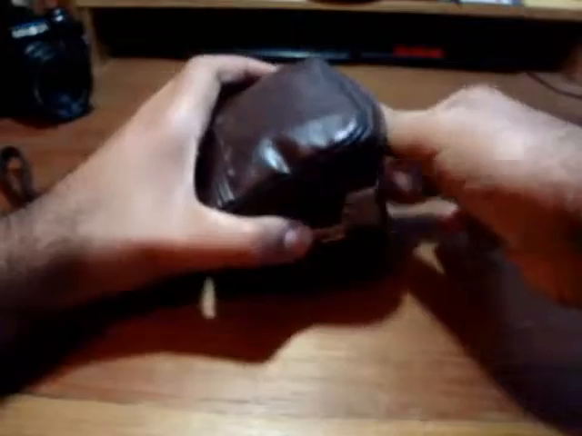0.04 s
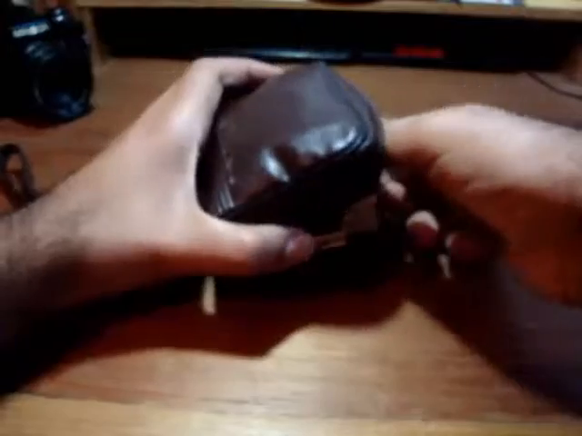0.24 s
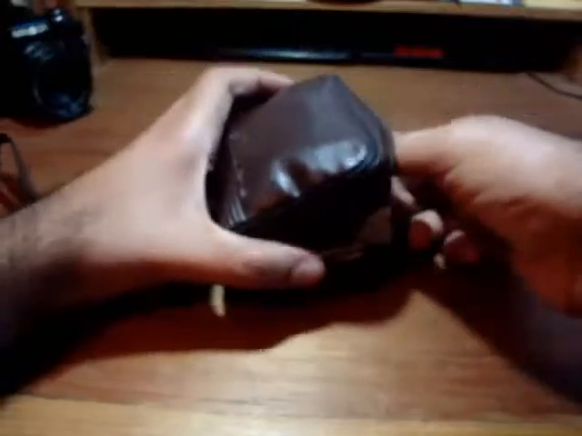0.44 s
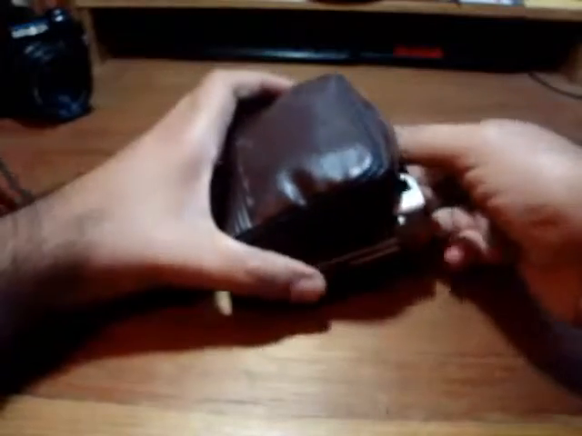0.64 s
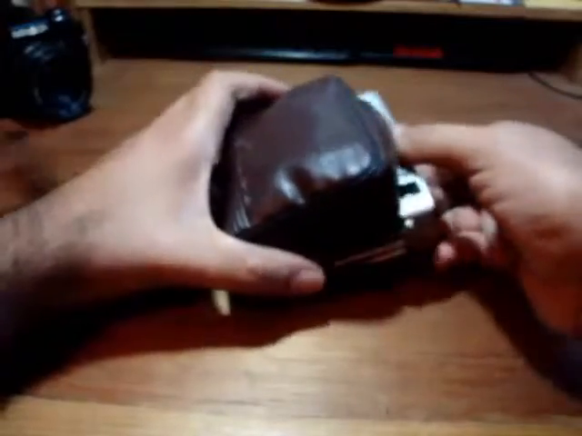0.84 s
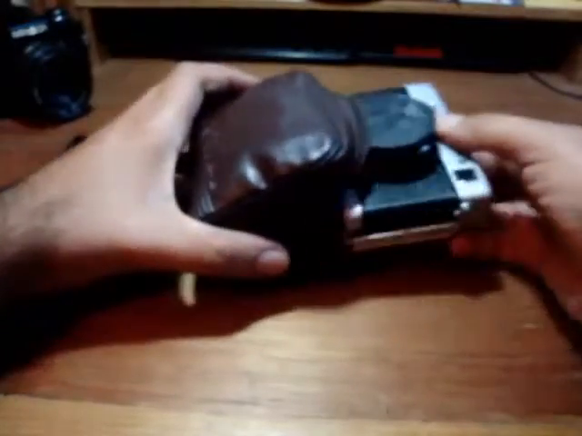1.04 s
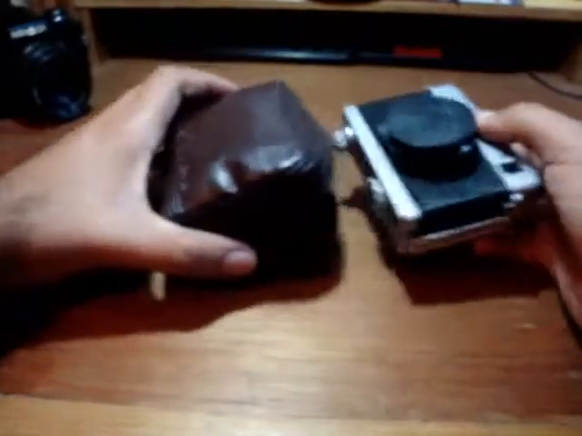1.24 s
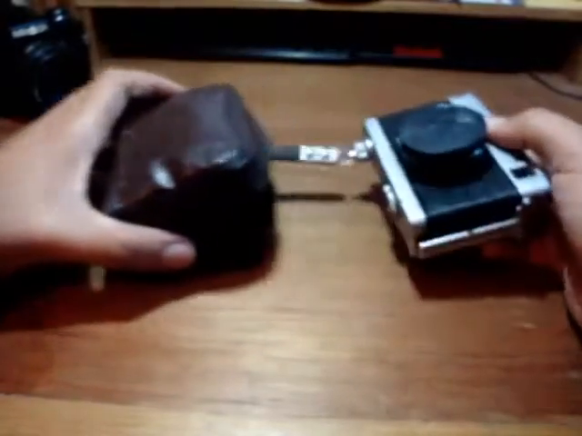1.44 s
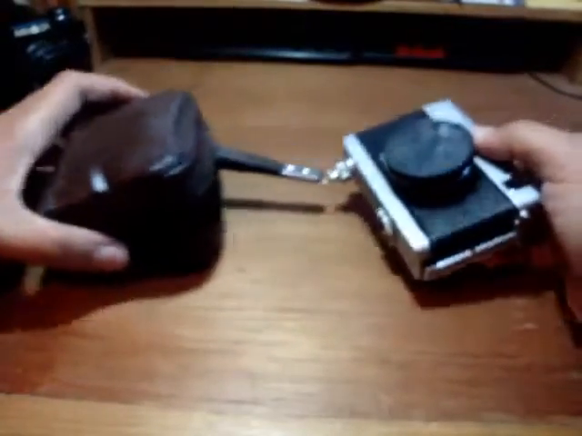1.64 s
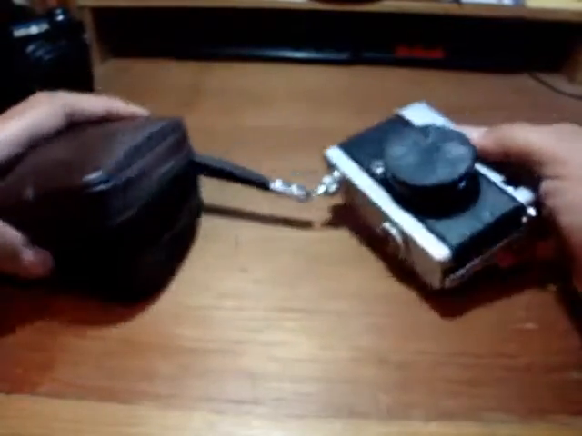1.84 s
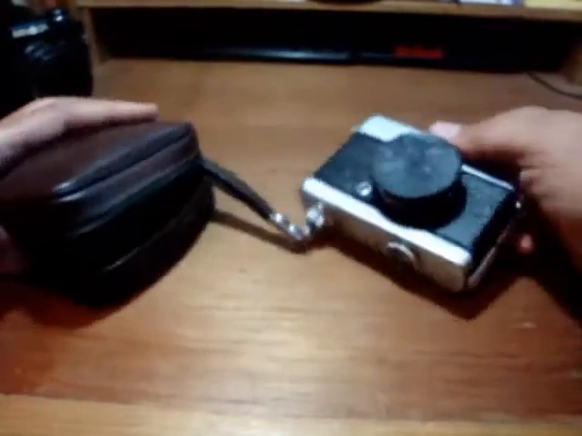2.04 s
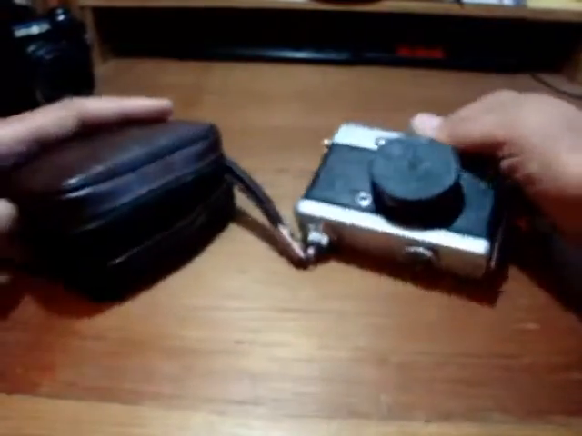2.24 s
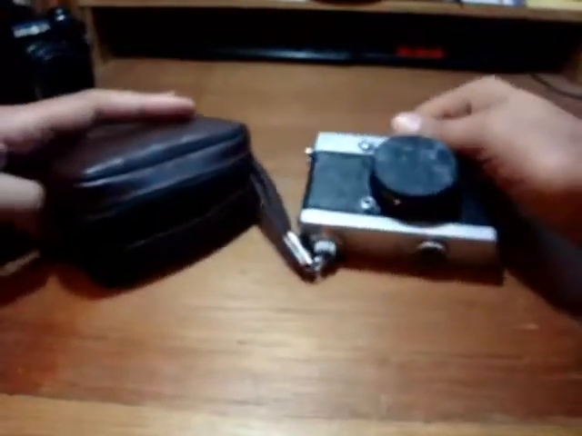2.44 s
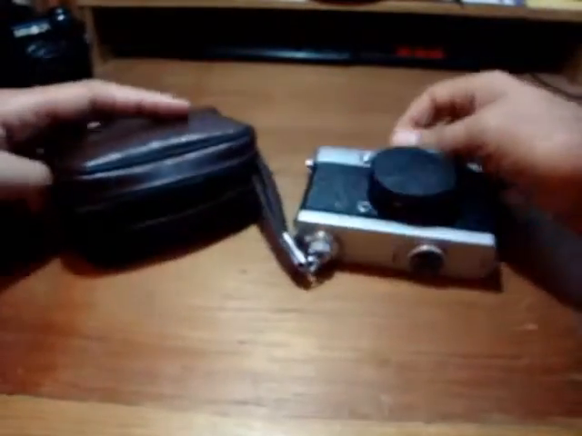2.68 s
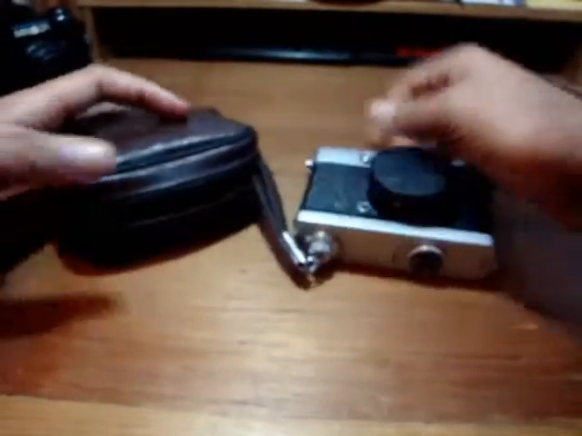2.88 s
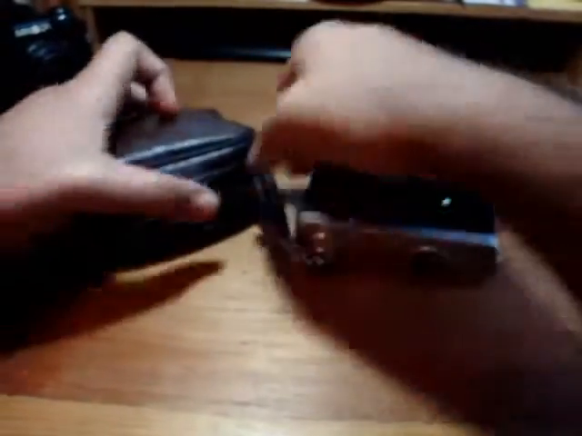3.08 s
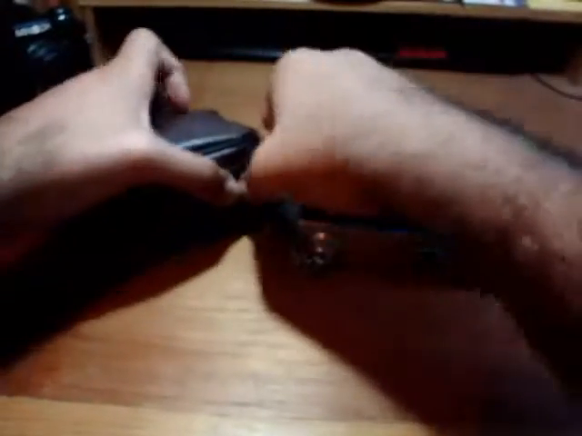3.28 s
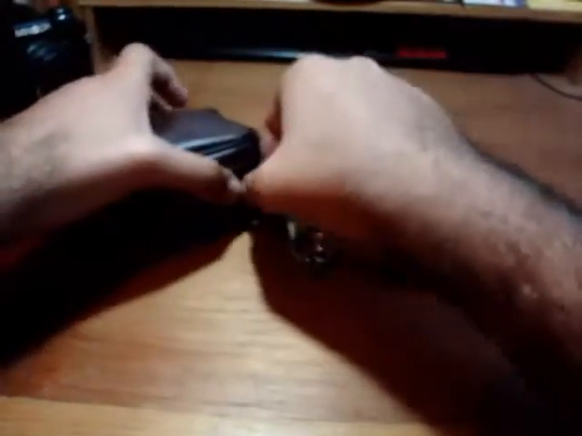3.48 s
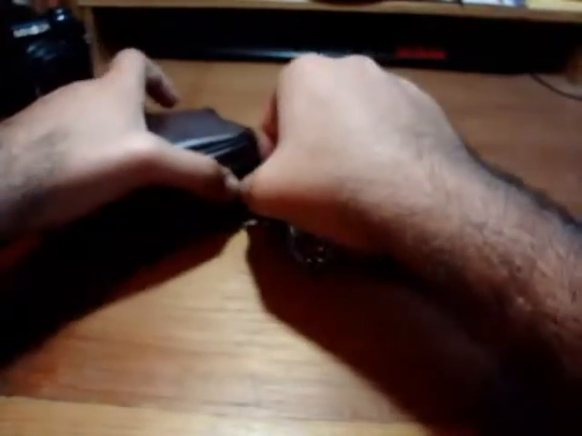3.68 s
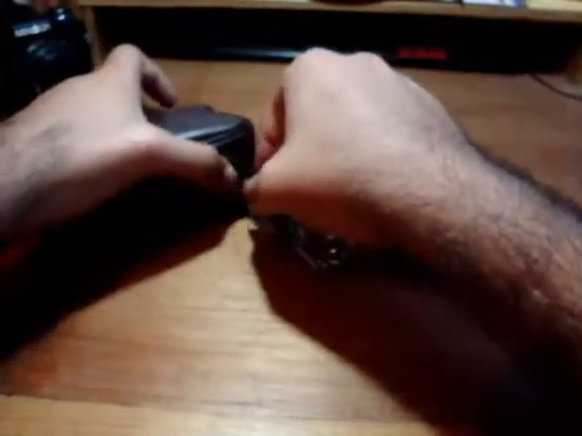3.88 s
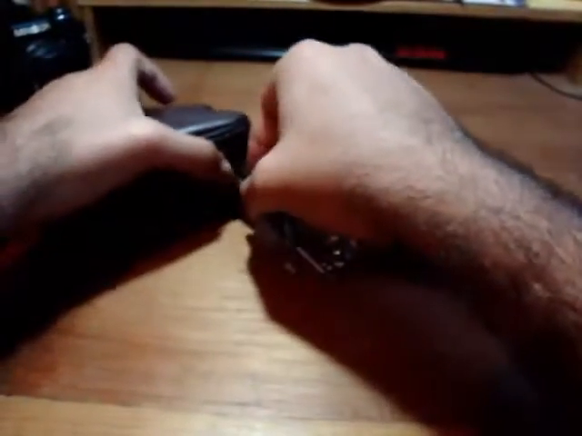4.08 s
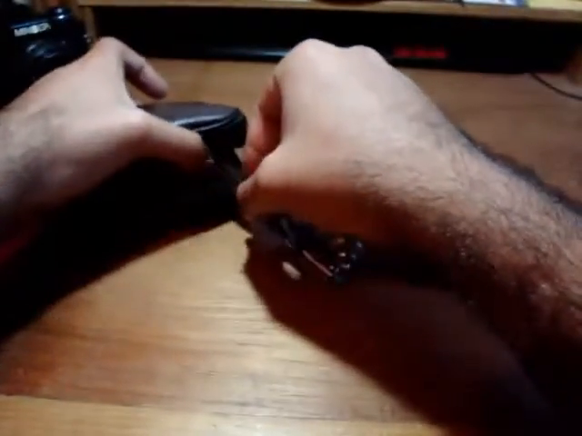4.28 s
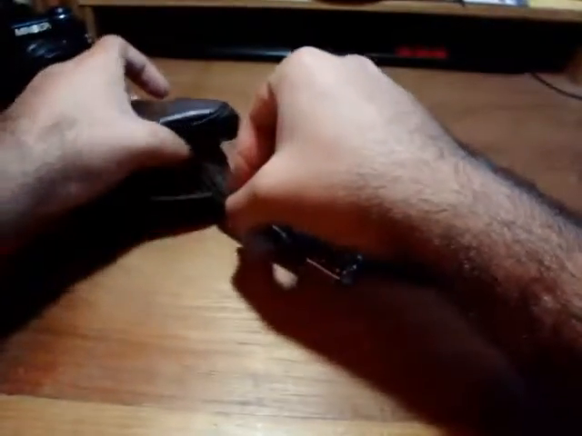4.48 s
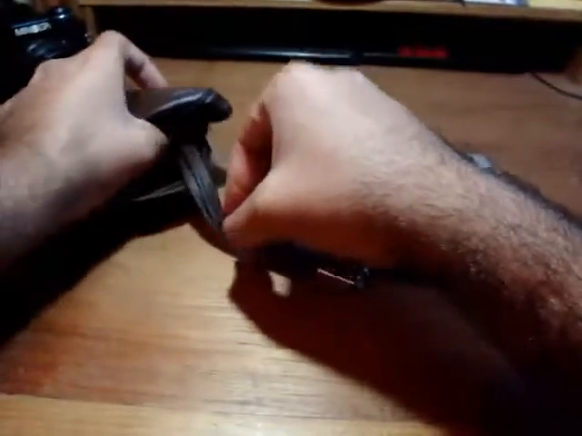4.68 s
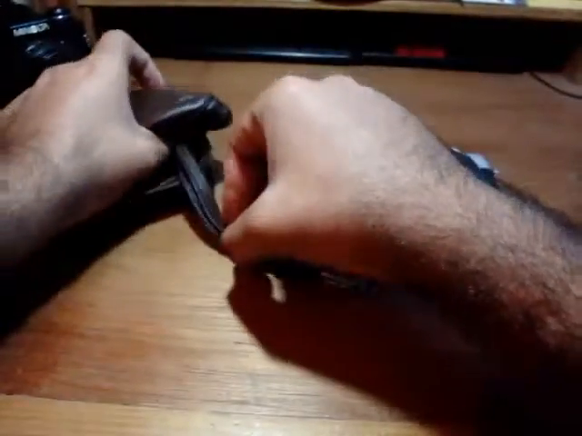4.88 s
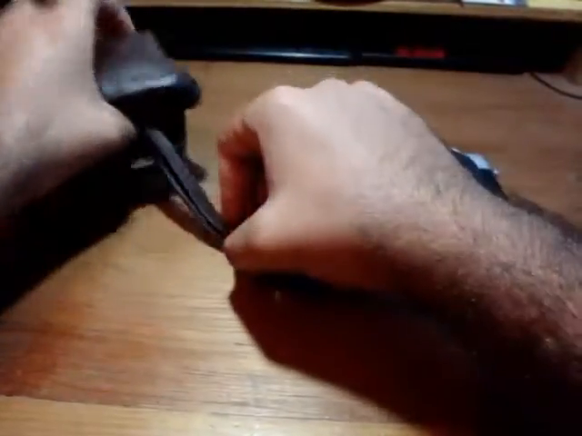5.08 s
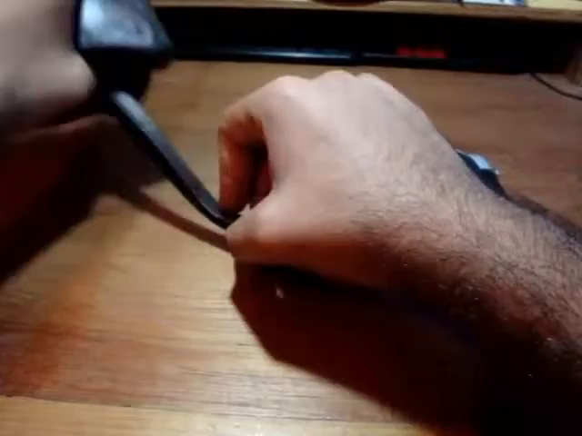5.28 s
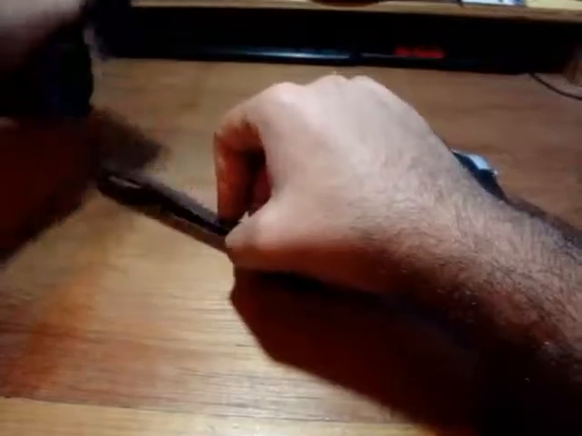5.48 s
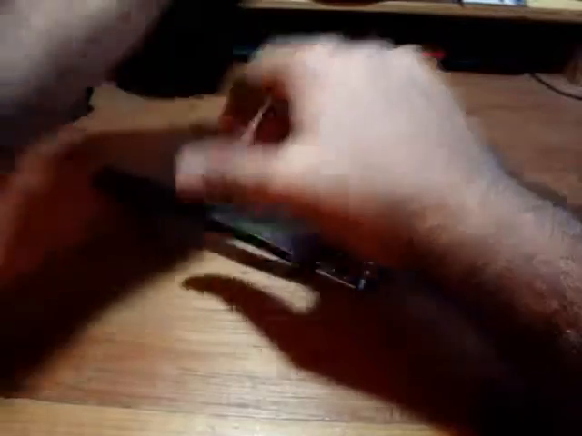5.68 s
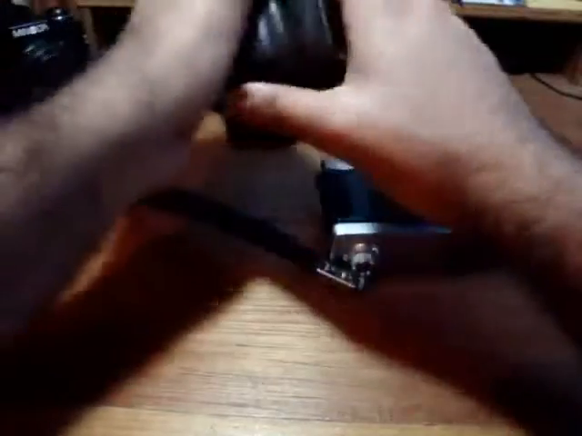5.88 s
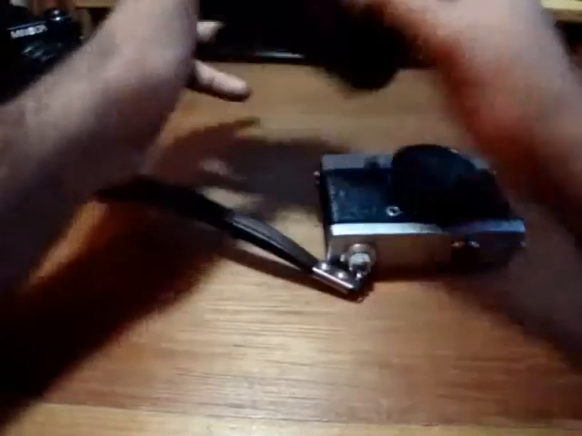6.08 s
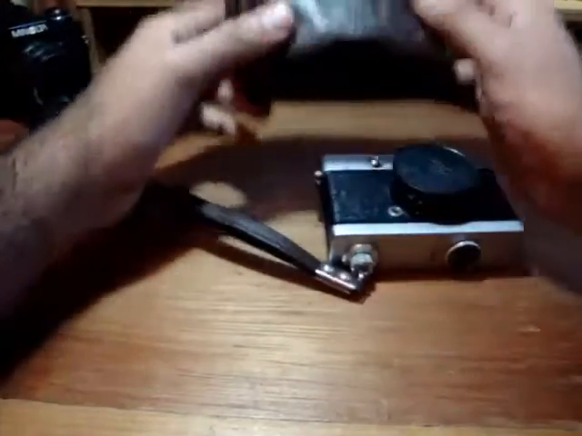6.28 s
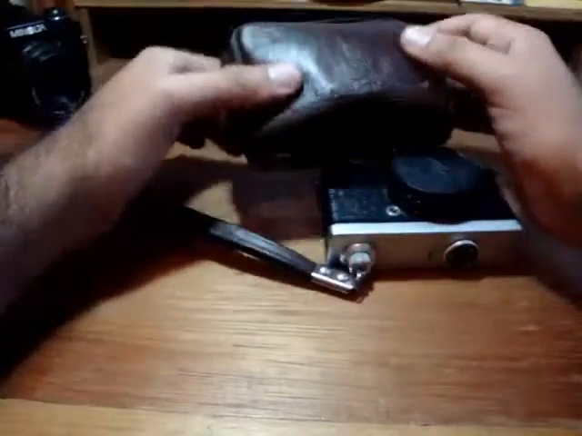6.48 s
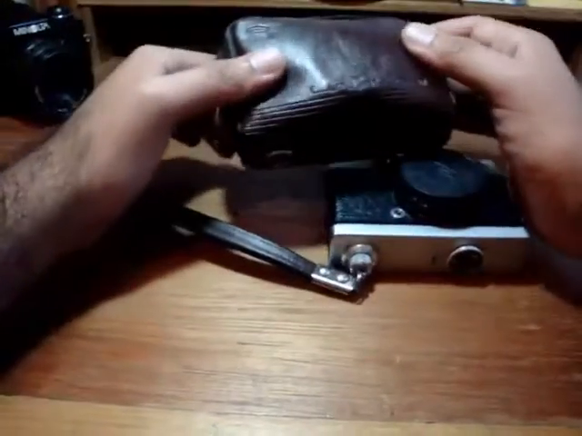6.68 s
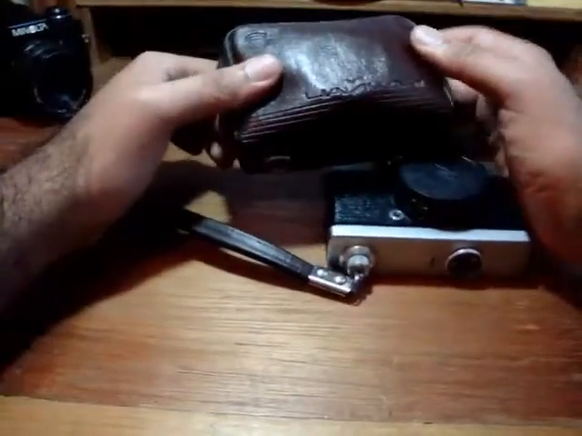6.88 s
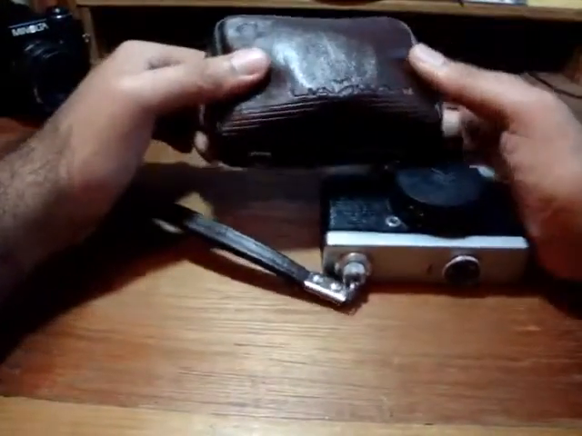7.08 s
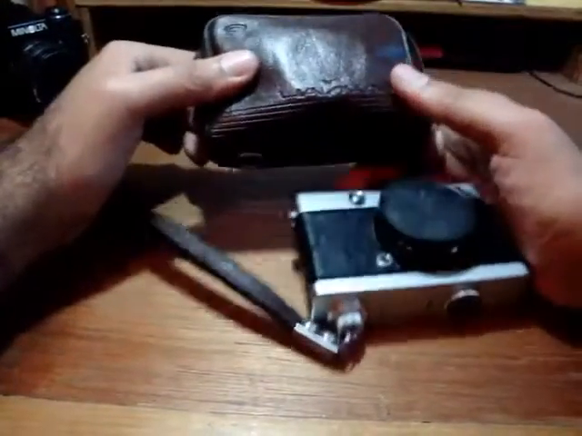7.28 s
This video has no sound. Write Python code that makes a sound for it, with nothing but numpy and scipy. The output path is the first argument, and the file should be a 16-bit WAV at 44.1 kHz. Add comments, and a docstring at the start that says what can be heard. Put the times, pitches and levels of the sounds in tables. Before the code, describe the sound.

A small metal camera slides from a stiff leather case with sharp ticks and creaks, then lands on a wooden desk with dull knocks.

```python
"""Leather rubs softly over a steady indoor hiss, then metal ticks begin: two hands pull a small metal
camera out of a stiff leather case, set it down on a wooden desk and free its strap.
Metal ticks are short rings, thuds are pushes into the ringing modes of the desk, and leather creaks,
scuffs, slides and dull desk tails are made of many tiny slips. A small hard room answers them all;
a hum, a thin whine and one faint rising tone lie underneath."""
import sys
import numpy as np
from scipy import signal
from scipy.fft import rfft, irfft, next_fast_len
from scipy.io import wavfile

SR = 44100
rng = np.random.default_rng(int(sys.argv[2]) if len(sys.argv) > 2 else 0)


def master(y):
    """Save y as 16-bit WAV."""
    cut = np.clip(np.atleast_2d(y).T, -1, 1)
    pcm = np.round(cut * 32767)  # scale
    wavfile.write(sys.argv[1], SR, pcm.astype(np.int16))


N = 323253   # length in samples


def from_db(db):
    """Turns a level in dB into a gain."""
    return 10 ** (np.asarray(db) / 20)


def rms_one(x):
    """Scales a sound to an average (rms) strength of 1."""
    return x / np.sqrt(np.mean(x ** 2) + 1e-20)


def peak_one(x):
    """Scales a sound so that its highest peak is 1."""
    return x / np.abs(x).max()


def sos_filter(x, order, hz, kind):
    """Smooth (Butterworth) filter that keeps the low, high or band part of a sound."""
    return signal.sosfilt(signal.butter(order, hz, kind, fs=SR, output="sos"), x)


def resonance(x, hz, width):
    """Something that likes to ring at one pitch: a two-pole resonance with gain 1 on top."""
    r = np.exp(-np.pi * width / SR)
    top = np.array([1, 0, -1]) * (1 - r * r) / 2
    return signal.lfilter(top, [1, -(1 + r * r) * np.cos(2 * np.pi * hz / SR), r * r], x)


def broad_ring(force, hz, width_share):
    """Two equal resonances in a row; their width is a share of the pitch."""
    width = width_share * hz
    return resonance(resonance(force, hz, width), hz, width)


def hard_part(x):
    """Hard surfaces ring little above 5 kHz."""
    return sos_filter(x, 4, 5000, "low")


def coloured(x, spectrum):
    """Lays a spectrum on a dense noisy signal; rms 1."""
    hz, db = np.transpose(spectrum)
    size = next_fast_len(N)
    bins = np.maximum(np.arange(size // 2 + 1) * SR / size, 1)
    gain = from_db(np.interp(np.log(bins), np.log(hz), db))
    return rms_one(irfft(rfft(x, size) * gain, size)[:N])


def drift(rate_hz):
    """Slow random wandering with a spread of 1."""
    r = np.exp(-2 * np.pi * rate_hz / SR)
    noise = rng.standard_normal(N + SR)
    return rms_one(signal.lfilter([1], [1, -2 * r, r * r], noise)[SR:])   # first second lets it settle


def slips(per_s, spread_db, clump_db):
    """Stick-slip friction: random clicks of uneven size that come in clumps."""
    sizes = from_db(spread_db * np.minimum(rng.exponential(1, N), 4)) * rng.choice([-1, 1], N)
    chance = per_s * from_db(clump_db * drift(25)) / SR
    return sizes * (rng.random(N) < chance)


RISE_SHARE = 0.052   # rise of the chatter as a share of its decay


def contact(decay_s):
    """One touch, then chatter that swells briefly and dies by 60 dB in decay_s; 60 ms long."""
    t = np.arange(SR * 6 // 100) / SR
    swell = np.minimum(t / (RISE_SHARE * decay_s), 1)
    chatter = rng.standard_normal(len(t)) * swell * from_db(-60 * t / decay_s)
    chatter[0] = 2.07   # the first touch
    return chatter


def add(track, s, piece, peak_db):
    """Lays a piece on a track at time s with the given peak."""
    i = round(s * SR)
    piece = piece[:N - i]
    track[i:i + len(piece)] += from_db(peak_db) * peak_one(piece)


# High rings of thin metal: f/Hz, width/Hz, level/dB
METAL_RINGS = [(5300, 9300, -7.5), (8300, 4500, 3), (10900, 770, 4), (15500, 4000, 2.5)]


def metal(force):
    """Thin metal parts ring in a few broad bands of the treble."""
    rings = 0
    for k, (hz, width, db) in enumerate(METAL_RINGS):
        rings = rings + (-1) ** k * from_db(db) * resonance(force, hz, width)   # signs alternate
    return sos_filter(rings, 2, 4600, "high")


# Hollow sounds of the leather case: f/Hz, width/Hz, level/dB
CASE_HOLLOWS = [(641.5, 204, 5), (836, 249, 7.5), (973, 256, 5.5), (1478, 220, -0.5), (1970, 354, -7)]


def case_body(x):
    """The hollow leather shell colours whatever excites it."""
    out = 0
    for k, (hz, width, db) in enumerate(CASE_HOLLOWS):
        out = out + (-1) ** k * from_db(db) * resonance(x, hz, width)   # signs alternate
    return out


FAVOUR_DB, FAVOUR_OCTAVES = 13, 0.16   # modes near the favoured pitch of a spot ring stronger
# Ringing modes of the desk top: f/Hz, level/dB, undamped time to fall by 60 dB t60/s
DESK_MODES = [(126, -20, 0.4), (182, -11.5, 0.38), (208.6, -6.5, 0.45), (262, -4, 0.62),
              (294.4, -2.5, 0.34), (336, -10.5, 0.28), (387.7, 2, 0.61), (442, 0.5, 0.15), (487, 4, 0.17),
              (533, 3, 0.14), (633, 7, 0.079), (732.3, 1.5, 0.35), (983, 4.5, 0.15), (1193, -5.5, 0.19),
              (1422, 3, 0.15)]


def desk_top(force, damping, vary_db=0, favour_hz=None):
    """Plate modes of the desk; hands and things resting on it shorten the ring by the factor damping."""
    out = 0
    for (hz, db, t60), chance in zip(DESK_MODES, rng.standard_normal(len(DESK_MODES))):
        if favour_hz:
            octaves_off = np.log2(hz / favour_hz)
            db = db + FAVOUR_DB * np.exp(-(octaves_off / FAVOUR_OCTAVES) ** 2)
        r = from_db(-60 / (t60 * damping * SR))
        w = 2 * np.pi * hz / SR
        mode = signal.lfilter([0, np.sin(w)], [1, -2 * r * np.cos(w), r * r], force)
        out = out + from_db(db + vary_db * chance) * mode
    return sos_filter(out, 6, 150, "high")   # a plate radiates no deep bass


def bright(force, hz, width_share, treble_db):
    """A hard surface answers with a broad ring at its pitch and some treble above it."""
    ring = hard_part(broad_ring(force, hz, width_share))
    return peak_one(ring) + from_db(treble_db) * peak_one(metal(force))


TICK_WIDTH = 0.65   # width of the ring as a share of its pitch
TICK_DESK_DB = -38   # answer of the desk, re the tick's level
PUFF_DB, PUFF_HZ = -13, 900   # one-sided push of air: peak re the tick's level, corner frequency
# Ticks of metal edges and strap links, level = peak of ring and treble together:
# t/s, level/dB, f/Hz, hollow case level/dB re that peak, treble level/dB re ring, chatter decay t/s
METAL_TICKS = [(0.0877, -25, 1440, 2, -36, 0.027), (0.2792, -21.5, 3450, -8, -14, 0.015),
               (0.284, -21.5, 3000, -4.5, -9.5, 0.02), (0.359, -36, 2600, 8.5, -21, 0.0077),
               (0.377, -24, 3330, 3, -10, 0.021), (0.408, -36, 3320, -12, -25, .012),
               (0.453, -37, 3260, -3, -11, 0.033), (0.4716, -27.5, 3200, -18, -20, 0.026),
               (0.479, -25.5, 3220, -17, -15, 0.011), (0.5523, -30, 2450, -4, -12, 0.03),
               (0.5933, -14.5, 3520, -12, -6.5, 0.017), (0.636, -25, 2840, -16, -8, 0.008),
               (0.649, -27.5, 3340, -2.5, -3, 0.029), (0.8514, -19, 3400, -14, -10, 0.029),
               (0.853, -15, 3640, -13, -8, 0.014), (0.8675, -6, 3520, -9, -9, 0.0014),
               (0.8697, -12, 3530, -16, -13, 0.028), (0.8795, -17, 3820, -11, -16, 0.022),
               (0.8822, -14.5, 3250, -11, -20, 0.026), (0.8885, -25, 3800, -11, -17, 0.015),
               (0.8925, -14, 3650, -8.5, -17, 0.027), (0.8970, -11, 3600, -10, -15, 0.005),
               (0.8992, -17, 3700, -12, -17, 0.021), (0.9040, -18.5, 3480, 0.5, -21, 0.014),
               (0.9345, -9.5, 2450, -9.5, -17, 0.05), (1.1555, -55, 2400, 5, -17, 0.026),
               (1.180, -50, 2400, 12, -17, 0.015), (1.298, -40, 1390, 8, -20, 0.022),
               (1.340, -33, 1410, -15, -20, 0.025), (1.444, -28, 1410, 2, -23, 0.038),
               (1.8357, -33, 2750, -15, -11, 0.027), (1.883, -26, 1450, 0.5, -19, 0.033),
               (1.9539, -34.5, 1670, 1.5, -25, 0.034), (2.04, -41, 2710, -20, 13, .015),
               (2.048, -31, 2710, -10, 13, 0.018), (2.1194, -39.5, 1400, 16.5, -13, 0.081),
               (2.1479, -33.5, 1420, 17.5, -20, 0.031), (2.185, -32, 3930, -18, 12, 0.022),
               (2.3638, -34, 1400, 17.5, -18, 0.021), (2.3692, -27, 3300, 7, -9, 0.016),
               (2.3761, -25.5, 3930, -17, -1, 0.011), (2.393, -37, 3500, 0, 0, 0.023),
               (2.539, -20.5, 2880, -4.5, -13.5, 0.02), (2.6247, -22, 3000, -4, -11, 0.018),
               (2.634, -25, 2930, -22, -18, 0.022), (2.647, -15, 3000, 2, -15, 0.07),
               (2.657, -22, 2600, 0, -13, 0.016), (2.6801, -8.5, 1340, -13, -18, 0.018),
               (3.102, -43, 3200, -10, -1, 0.031), (3.666, -37, 1320, 6.5, -10, 0.091),
               (4.1336, -34.5, 3760, -20, -4, 0.01), (4.4037, -40, 1750, 5, -21, 0.069),
               (4.4676, -45.5, 1420, 15, -21, 0.023), (4.6528, -29, 2700, 0, 8, 0.034),
               (4.7093, -26.5, 1630, 0, -9, 0.013), (4.718, -29, 2900, -1, 1, 0.0065),
               (4.879, -31, 1460, -0.5, -17, 0.017), (5.3907, -19.5, 2770, -14, 3, 0.013),
               (5.3938, -34, 1450, -12, -25, 0.014), (5.6728, -29.5, 3770, -7.5, -2.5, 0.017),
               (5.817, -35.5, 2650, -15, -1, 0.016), (5.8713, -54, 1710, 16, -30, 0.071),
               (5.949, -42, 1500, 0, -27, 0.015), (5.97, -27.5, 1760, -21, -1, 0.047),
               (6.141, -41.5, 2380, -20, -25, 0.026), (6.195, -49.5, 1840, 12.5, -21, 0.026),
               (6.3112, -37, 1460, 3, -21, 0.021), (6.4851, -31, 1550, 1, -11, 0.12),
               (6.51, -22, 3200, -21, -11, .022), (6.5111, -16.5, 1550, -10, -27, 0.038),
               (6.563, -39, 3800, -15, 6, .015), (7.1076, -30, 3270, -9, -25, 0.013),
               (7.1686, -22, 3180, -2, -6.5, 0.024), (7.1795, -21, 3380, -12, -9, 0.021),
               (7.19, -25, 3180, -2, -24, 0.09), (7.2274, -22.5, 1540, -13, -16, 0.063),
               (7.249, -24, 3620, 1, -6, 0.015), (7.27, -24, 2600, 0, 3, .015),
               (7.285, -27, 2780, -6, -10, 0.013)]


def ticks():
    """Each tick is a short hard ring with a puff of air, plus an answer from case and desk."""
    out = np.zeros(N)
    puff = np.exp(-2 * np.pi * PUFF_HZ * np.arange(SR // 100) / SR)
    for s, db, hz, case_db, treble_db, decay_s in METAL_TICKS:
        force = contact(decay_s)
        add(out, s, bright(force, hz, TICK_WIDTH, treble_db), db)
        add(out, s, case_body(force), db + case_db)
        add(out, s, puff, db + PUFF_DB)
        add(out, s, desk_top(force, damping=0.12), db + TICK_DESK_DB)
    return out


THUD_DECAY_S, THUD_VARY_DB = 0.02, 3.5   # rattle decay; each push stirs the modes a little differently
# Landings on the desk, and soft pushes that keep its low ring going, level = peak of the desk's ring:
# t/s, level/dB, hardness of the contact f/Hz, favoured desk pitch f/Hz, stand shake level/dB re ring
DESK_PUSHES = [(2.148, -9, 1290, 503, -38), (2.160, -16.5, 700, 203, -40), (2.175, -16.5, 805, 480, -34),
               (2.366, -18.5, 1290, 630, -34), (2.372, -13.5, 800, 385, -40), (2.386, -19.5, 705, 380, -37),
               (2.596, -24, 800, 375, -30), (2.612, -18.5, 700, 305, -30), (2.635, -15, 930, 199, -17),
               (2.645, -16, 930, 710, -34), (2.660, -19, 800, 332, -33), (2.677, -12, 930, 280, -35),
               (2.685, -15, 900, 427, -30), (2.693, -21, 900, 200, -34), (2.706, -23, 900, 400, -31),
               (2.736, -21.5, 700, 270, -34), (2.759, -32, 710, 260, -34), (2.776, -37, 704, 265, -37),
               (4.653, -22, 1300, 570, -43), (4.668, -31.5, 700, 302, -38), (4.685, -29, 700, 302, -38),
               (4.711, -28, 800, 390, -38), (4.699, -31.5, 800, 400, -38), (4.741, -37, 1000, 690, -38),
               (5.398, -21, 950, 720, -30), (7.142, -23, 800, 520, -25), (7.176, -19, 700, 230, -34),
               (7.187, -15.5, 810, 375, -24), (7.196, -18.5, 700, 365, -28), (7.205, -21, 700, 385, -28),
               (7.214, -17, 700, 313, -32), (7.225, -31, 700, 405, -30), (7.259, -24, 700, 272, -28),
               (7.286, -20, 930, 367, -30)]


def thuds():
    """A soft contact is one low-passed push into the desk modes, with a little rattle behind it."""
    out = np.zeros(N)
    for s, db, hard_hz, favour_hz, jolt_db in DESK_PUSHES:
        time_to_ring = np.full(SR // 8, 1e-18)   # practically silent
        force = np.r_[.15 * contact(THUD_DECAY_S), time_to_ring]
        force[0] = 1
        push = sos_filter(force, 2, hard_hz, "low")
        ring = desk_top(push, damping=0.23, vary_db=THUD_VARY_DB, favour_hz=favour_hz)
        add(out, s, ring, db)
        jolt = sos_filter(push, 2, [35, 85], "band")   # the desk's shake in the microphone stand
        add(out, s, jolt, db + jolt_db)
    return out


FALL_DB = 30   # lost over one fall time
GRIT_WIDTH, GRIT_TREBLE_DB = 1, -6.5   # width as a share of the pitch; treble re grit
DESK_SOFT_HZ = 1260   # these dense slips drive the desk softly


def add_friction(out, grit, s, rise, fall, creak, rough, desk):
    """A swell of dense slips drives case, rough surface and desk, each given as (rms dB, pitch Hz)."""
    (creak_db, creak_hz), (rough_db, rough_hz), (desk_db, favour_hz) = creak, rough, desk
    i = round(s * SR)
    force = grit[i:i + round((rise + 2 * fall + .02) * SR)]
    t = np.arange(len(force)) / SR
    force = force * np.minimum((t / rise) ** 0.73, from_db(-FALL_DB * (t - rise) / fall))
    rough_part = hard_part(broad_ring(force, rough_hz, GRIT_WIDTH))
    creak_part = resonance(case_body(force), creak_hz, 0.22 * creak_hz)   # favours one region of the shell
    soft_force = sos_filter(force, 1, DESK_SOFT_HZ, "low")
    desk_part = desk_top(soft_force, damping=0.44, favour_hz=favour_hz)
    parts = [(rough_db, rough_part), (creak_db, creak_part), (desk_db, desk_part),
             (rough_db + GRIT_TREBLE_DB, metal(force))]
    out[i:i + len(t)] += sum(from_db(db) * rms_one(part) for db, part in parts)


SHAKEN_CASE_HZ = 1110   # favoured pitch of the case part
# Slides on the desk and the dull lingering sound of the desk after landings, level = rms of the desk part:
# t/s, rise t/s, fall t/s, level/dB, favoured desk pitch f/Hz, case level/dB re desk,
# grit level/dB re desk, grit f/Hz
SLIDES_AND_TAILS = [(2.152, 0.003, 0.096, -38, 476, -2.5, -8.5, 2130),
                    (2.19, 0.054, 0.07, -45, 480, -12, -13.5, 2000),
                    (2.25, 0.14, 0.064, -46.5, 475, -0.5, -3, 2000),
                    (2.363, 0.0014, 0.029, -37.5, 630, -3, -15, 2520),
                    (2.41, 0.031, 0.12, -45, 270, -28, -22, 2000),
                    (2.576, 0.037, 0.015, -33, 300, -10.5, -15.5, 2500),
                    (2.621, 0.0032, 0.1, -27, 305, -3, -2, 3100),
                    (2.67, 0.0063, 0.3, -39, 440, 0, -5.5, 2580),
                    (2.71, 0.061, 0.024, -62, 270, -12, -7, 2020),
                    (4.661, 0.011, 0.37, -56.5, 322, -8, -11, 2500),
                    (5.407, 0.0035, 0.17, -47.5, 432, 0.5, -3, 2300),
                    (6.52, 0.071, 0.27, -51.5, 320, -2.5, -9, 2500),
                    (7.058, 0.061, .04, -43, 275, -14, -12.5, 2300),
                    (7.101, 0.1, 0.049, -33.5, 380, -10, -9.5, 2250),
                    (7.21, 0.03, 0.23, -34.5, 300, -4.5, -6.5, 2490)]


def slides_and_tails(grit):
    """Swells of slips that sound mostly in the desk, with the case and some grit along with it."""
    out = np.zeros(N)
    for s, rise, fall, db, favour_hz, case_db, grit_db, grit_hz in SLIDES_AND_TAILS:
        add_friction(out, grit, s, rise, fall, creak=(db + case_db, SHAKEN_CASE_HZ),
                     rough=(db + grit_db, grit_hz), desk=(db, favour_hz))
    return out


SCUFF_DESK_DB = -17.5   # a scuff reaches the desk faintly; re creak
# Leather scuffs in the hands, level = rms of the creak:
# t/s, rise t/s, fall t/s, level/dB, creak f/Hz, grit level/dB re creak, grit f/Hz
LEATHER_SCUFFS = [(0.061, 0.0088, 0.13, -43.5, 970, -10.5, 2730), (.1, 0.045, 0.012, -44.5, 830, -12, 2820),
                  (0.444, 0.022, 0.1, -55, 1050, 2.5, 2950), (.52, 0.049, 0.026, -48, 915, -6.5, 2340),
                  (.599, 0.023, 0.056, -49, 1000, -4, 3180), (0.872, 0.018, 0.087, -43, 820, 7, 3370),
                  (0.9088, 0.0065, 0.014, -31, 860, -28, 2780),
                  (0.933, 0.0034, 0.014, -29, 1290, -4.5, 2700), (0.936, 0.0017, 0.32, -41, 1000, -4, 2830),
                  (1.149, 0.0034, 0.055, -48, 865, -3, 2860), (1.27, 0.12, 0.11, -47.5, 1010, -3, 1810),
                  (1.40, 0.022, 0.059, -44, 1420, -14, 1930), (1.45, 0.033, 0.1, -46, 890, -10, 1620),
                  (3.1, 0.029, 0.028, -55.5, 846, 2, 4030), (4.647, 0.0088, 0.097, -42, 680, -10, 2440),
                  (4.725, 0.02, 0.012, -46, 720, -9, 2580), (4.91, 0.019, 0.029, -45.5, 706, -6.5, 2470),
                  (5.392, 0.0019, 0.014, -32, 1420, -4, 2740), (5.935, 0.047, 0.037, -40.5, 794, -12, 2510),
                  (5.994, 0.021, 0.048, -51, 870, -4.5, 3240), (6.12, 0.053, 0.3, -56.5, 790, -3.5, 2720),
                  (6.482, 0.0012, 0.027, -41, 730, -6, 3000), (6.512, 0.0012, 0.011, -44, 905, -4, 3260)]


def scuffs(grit):
    """Leather sticks and slips in the hands: the shell creaks and its rough surface adds grit."""
    out = np.zeros(N)
    for s, rise, fall, db, hz, grit_db, grit_hz in LEATHER_SCUFFS:
        add_friction(out, grit, s, rise, fall, creak=(db, hz),
                     rough=(db + grit_db, grit_hz), desk=(db + SCUFF_DESK_DB, hz))
    return out


SCRAPE_RE_GRIP_DB, SCRAPE_FOLLOWS = -11.5, 1   # desk scrape re mean creak; share of the creak's swing in dB
# Colour of the dry rubbing hiss: f/Hz, level/dB per Hz (relative)
RUB_COLOUR = [(700, -20), (1200, -7), (1800, 5.5), (2800, 10), (3800, 3), (5300, 6), (8000, -0.5),
              (12000, -9), (16000, -1.5)]
# Steady rubbing of hands on leather: t/s, creak level/dB, dry hiss level/dB
HAND_GRIP = [(0.0, -49.5, -57), (0.33, -53, -65), (0.45, -48, -57), (0.9, -53.5, -58.5), (1.02, -43, -54),
             (1.3, -50, -51.5), (1.53, -49, -52), (2.139, -48.5, -51), (2.28, -41, -53.5),
             (2.57, -46.5, -58), (2.72, -36, -47), (2.88, -50, -53.5), (3.51, -50.5, -57.5),
             (4.2, -53, -58), (4.53, -48, -54), (6.55, -53, -55), (7.0, -54, -56), (7.15, -38.5, -48),
             (7.29, -37, -60), (7.33, -43, -56)]


def rubbing():
    """Creak in the case, hiss of dry surfaces and scrape in the desk, all driven by slips."""
    s, *levels = np.transpose(HAND_GRIP)
    creak_db, hiss_db = (np.interp(np.arange(N) / SR, s, db) for db in levels)
    mean_db = creak_db.mean()
    scrape_db = mean_db + SCRAPE_RE_GRIP_DB + SCRAPE_FOLLOWS * (creak_db - mean_db)
    creak = rms_one(case_body(slips(900, spread_db=-2.0, clump_db=5.0)))
    hiss = coloured(slips(9000, spread_db=3.5, clump_db=4.5), RUB_COLOUR)
    scrape = rms_one(desk_top(slips(400, spread_db=5.0, clump_db=3.5), damping=0.29))
    return from_db(creak_db) * creak + from_db(hiss_db) * hiss + from_db(scrape_db) * scrape


DRONE_S, DRONE_LENGTH_S, DRONE_FADE_S = 4.17, .31, .08   # start, length, fade at each end
DRONE_HZ, DRONE_RISE_HZ_PER_S, DRONE_DB = 410, 75, -49.5   # starting pitch, climb, middle level


def drone():
    """A soft low wavering sine that fades in, climbs a little and fades out."""
    t = np.arange(N) / SR - DRONE_S
    pitch_hz = DRONE_HZ + DRONE_RISE_HZ_PER_S * t + 5.5 * drift(8.5)
    phase = 2 * np.pi * np.cumsum(pitch_hz) / SR
    fade = np.clip(np.minimum(t, DRONE_LENGTH_S - t) / DRONE_FADE_S, 0, 1)
    return fade * from_db(DRONE_DB + 2.0 * drift(9.5)) * np.sin(phase)


AIR_DB = -52   # middle level of the indoor hiss
HUM_HZ, HUM_WIDTH_HZ, HUM_DB = 291.6, 8.9, -57   # a wavering low hum
# Colour of the indoor hiss: f/Hz, level/dB per Hz (relative)
AIR_COLOUR = [(25, 6), (50, -7.5), (95, -7.5), (140, -2), (300, 6), (500, 5), (670, 1.5), (1100, -0.5),
              (1750, -10.5), (2100, -13.5), (4050, -5), (4700, -21.5), (9700, -15), (16000, -29)]
# Two thin steady tones: f/Hz, level/dB re the whine level
WHINE_TONES = [(1709, 4.5), (4020, 0.5)]
# Level of the whine over time: t/s, level/dB
WHINE_LEVELS = [(0, -62), (2.9, -73), (3.4, -65), (6.1, -65.5), (6.4, -66), (7.33, -71)]


def background():
    """Indoor hiss is shaped noise that breathes a little; hum is narrow noise, whine is two wavering sines."""
    t = np.arange(N) / SR
    air = from_db(AIR_DB + 1.0 * drift(0.76)) * coloured(rng.standard_normal(N), AIR_COLOUR)
    hum = from_db(HUM_DB) * rms_one(resonance(rng.standard_normal(N), HUM_HZ, HUM_WIDTH_HZ))
    whine = 0
    for hz, db in WHINE_TONES:
        phase = 2 * np.pi * hz * t + 1.6 * drift(1.4)
        whine = whine + from_db(db + 0.74 * drift(2.0)) * np.sin(phase)
    whine_db = np.interp(t, *np.transpose(WHINE_LEVELS))
    return air + hum + from_db(whine_db) * whine


ROOM_T60_S, WALL_CUT_HZ = 0.41, 3260   # time to fall by 60 dB; the walls dull what lies above


def room(x):
    """Dense reflections: decaying noise after a first gap, duller than the direct sound."""
    t = np.arange(SR * 7 // 10) / SR
    gap = np.clip((t - .003) / 0.0032, 0, 1)
    tail = rng.standard_normal(len(t)) * from_db(-60 * t / ROOM_T60_S) * gap
    tail = sos_filter(tail, 1, WALL_CUT_HZ, "low")
    return signal.fftconvolve(x, tail / np.sqrt(np.sum(tail ** 2)))[:N]


HANDLING_ROOM_DB, THUD_ROOM_DB = -18.5, -12   # how much of each the room gives back


def scene():
    """Handling and thuds, their room, the faint tone and the background."""
    grit = slips(5000, spread_db=2.0, clump_db=2.0)   # shared by slides, tails and scuffs
    desk_thuds = thuds()
    handling = ticks() + slides_and_tails(grit) + scuffs(grit) + rubbing()
    wet = room(from_db(HANDLING_ROOM_DB) * handling + from_db(THUD_ROOM_DB) * desk_thuds)
    return (handling + desk_thuds + wet + drone() + background())[None]


CUTOFF_HZ = 15950   # nearly nothing passes above
# Steps in the microphone's treble, each changing all that lies above: f/Hz, level/dB
TREBLE_STEPS = [(4900, -1), (10000, -5)]


def record(dry):
    """A small microphone with little bass and a treble that falls in steps; the top is cut."""
    out = sos_filter(dry, 2, 60, "high")
    for hz, db in TREBLE_STEPS:
        low = sos_filter(out, 9, hz, "low")
        high = sos_filter(out, 9, hz, "high")
        out = low + from_db(db) * high
    return signal.sosfilt(signal.ellip(12, .5, 75, CUTOFF_HZ, fs=SR, output="sos"), out)


dry = scene()
out = record(dry)
master(out)
```